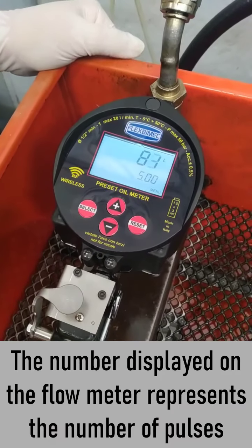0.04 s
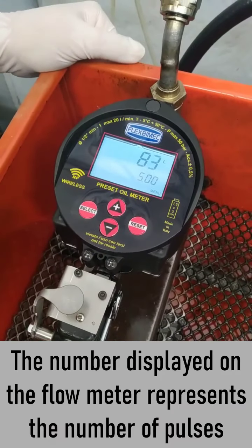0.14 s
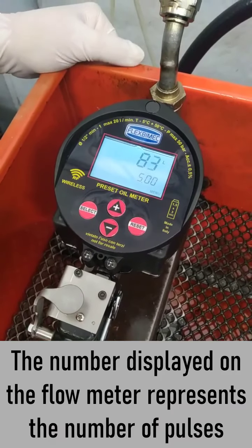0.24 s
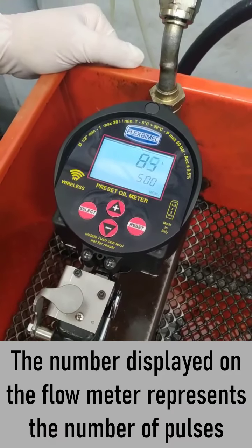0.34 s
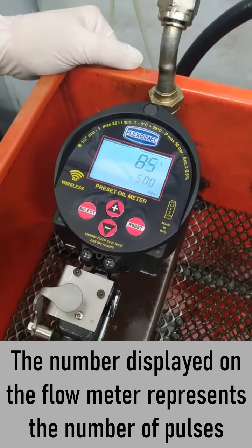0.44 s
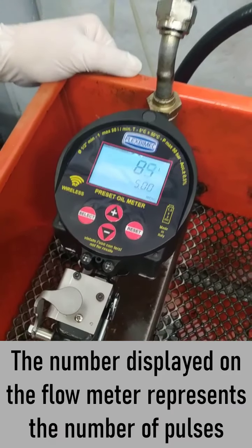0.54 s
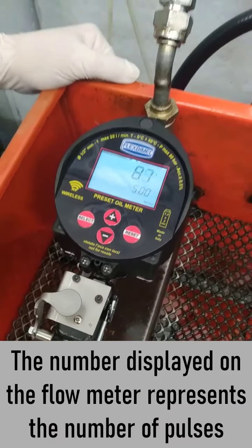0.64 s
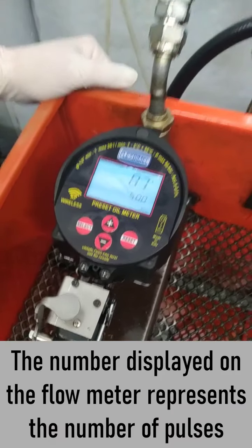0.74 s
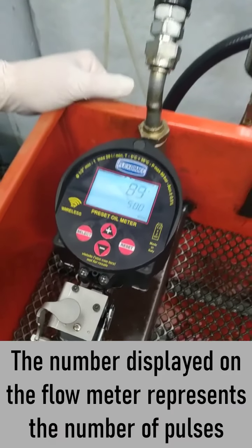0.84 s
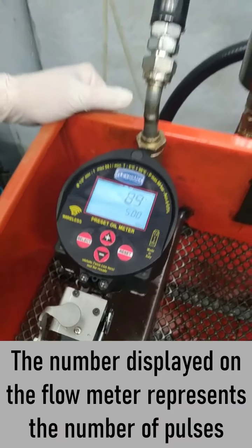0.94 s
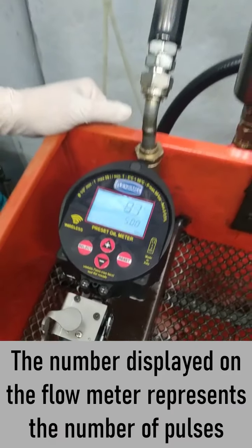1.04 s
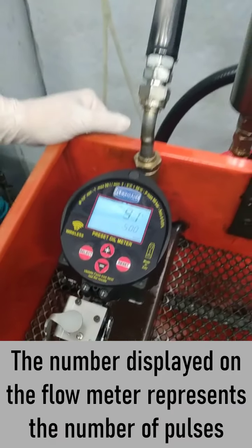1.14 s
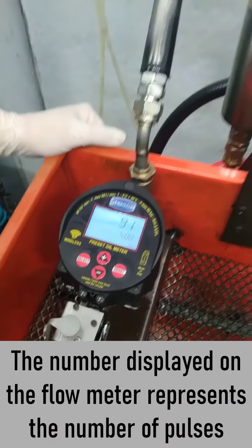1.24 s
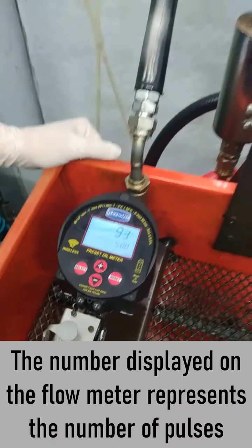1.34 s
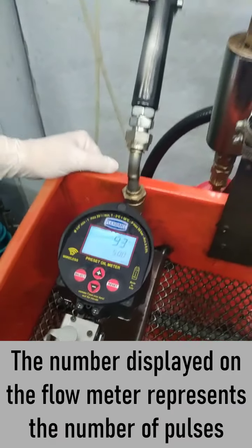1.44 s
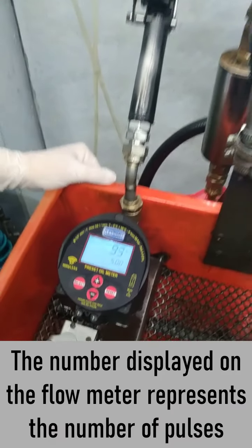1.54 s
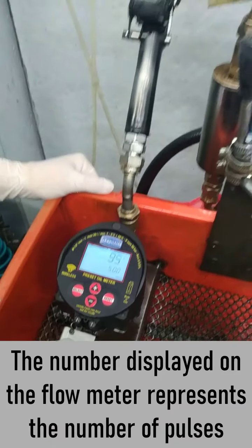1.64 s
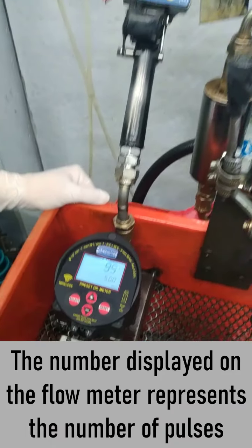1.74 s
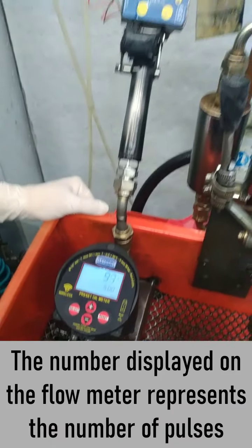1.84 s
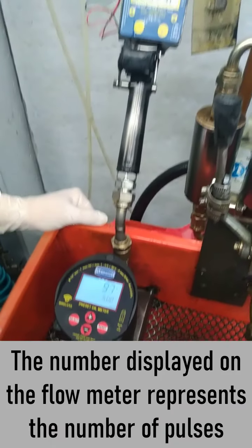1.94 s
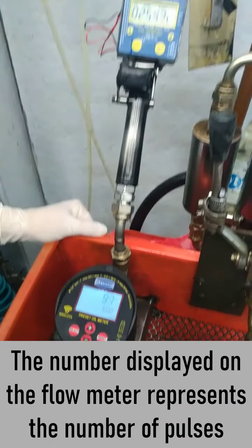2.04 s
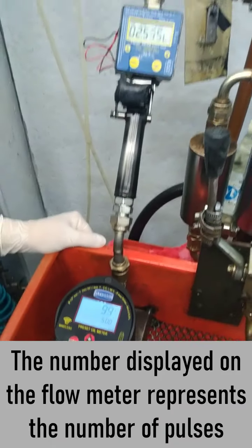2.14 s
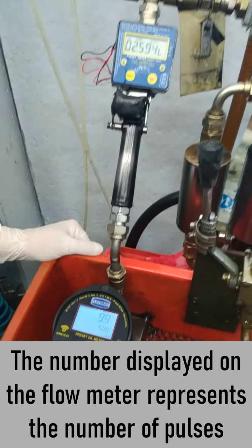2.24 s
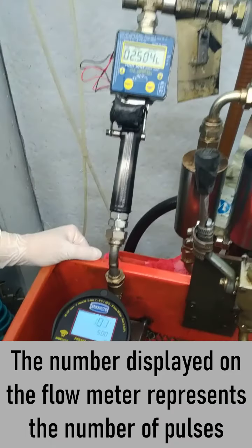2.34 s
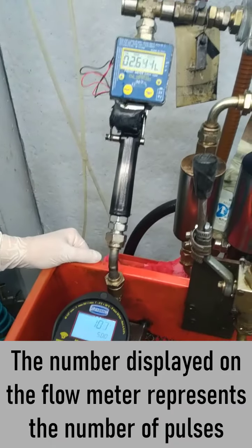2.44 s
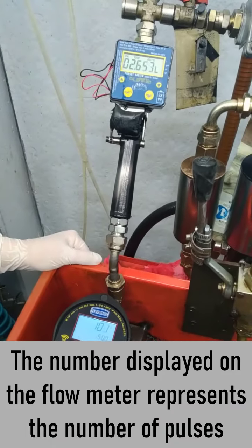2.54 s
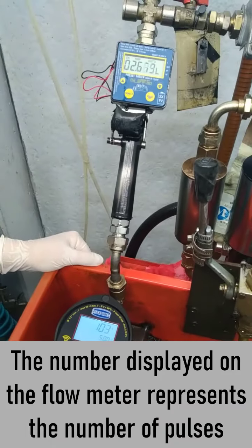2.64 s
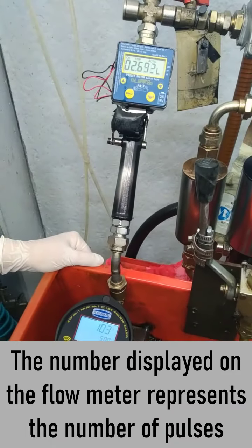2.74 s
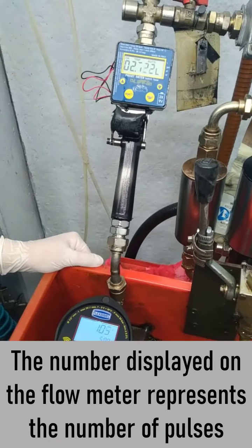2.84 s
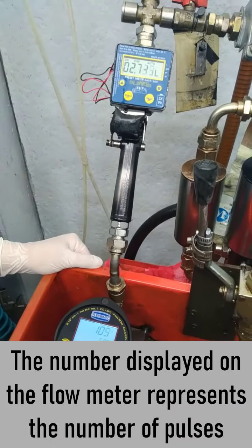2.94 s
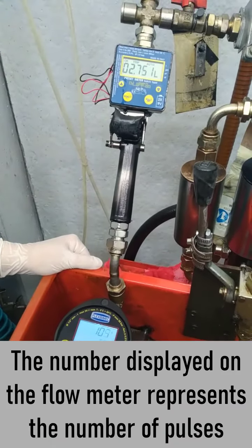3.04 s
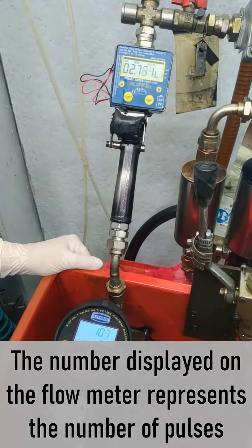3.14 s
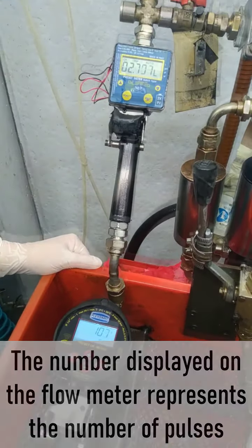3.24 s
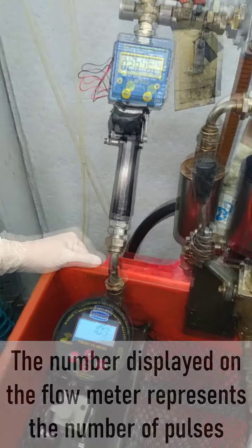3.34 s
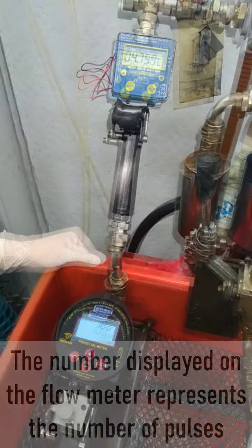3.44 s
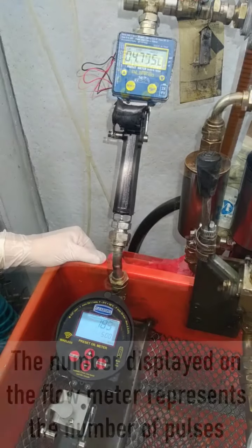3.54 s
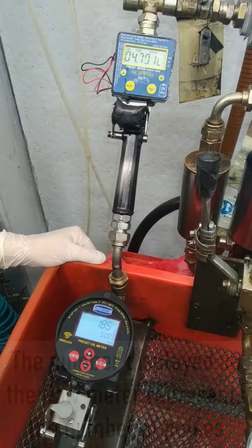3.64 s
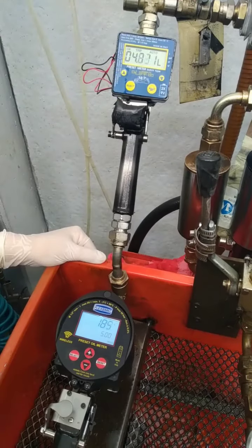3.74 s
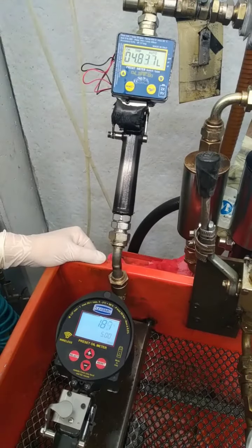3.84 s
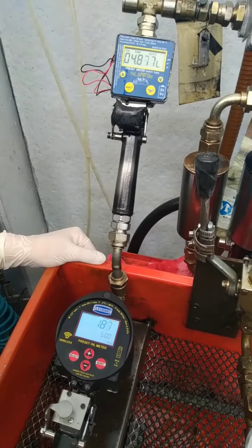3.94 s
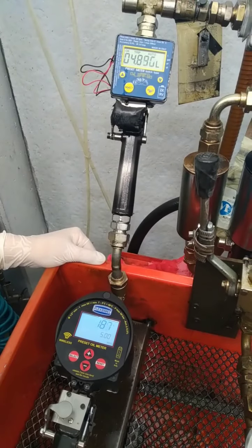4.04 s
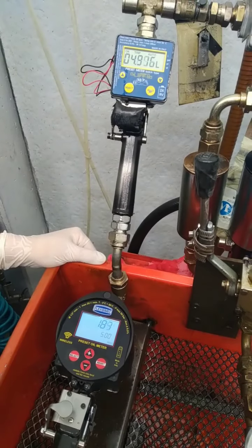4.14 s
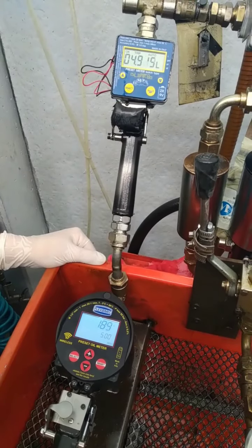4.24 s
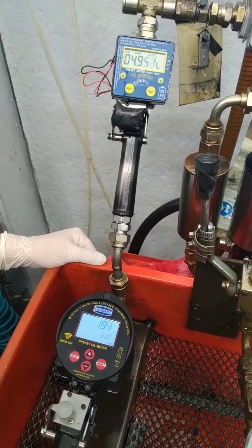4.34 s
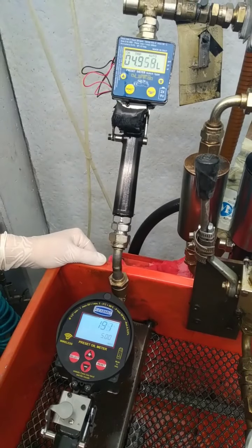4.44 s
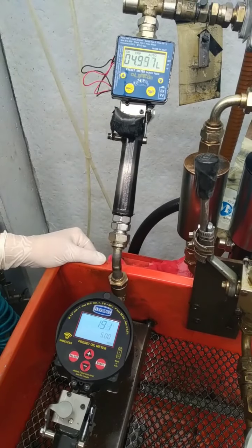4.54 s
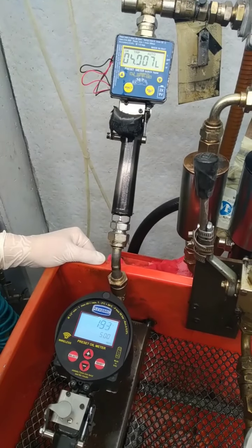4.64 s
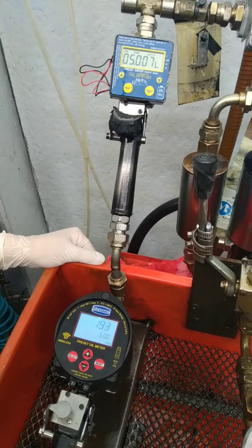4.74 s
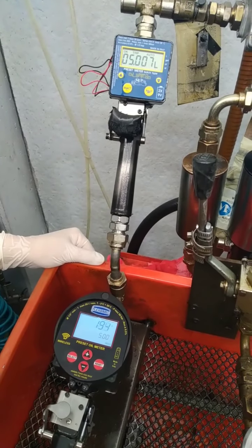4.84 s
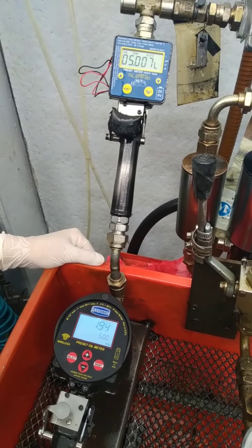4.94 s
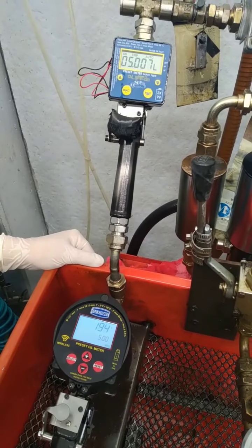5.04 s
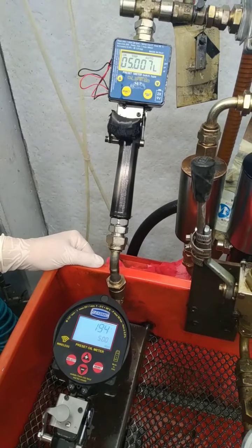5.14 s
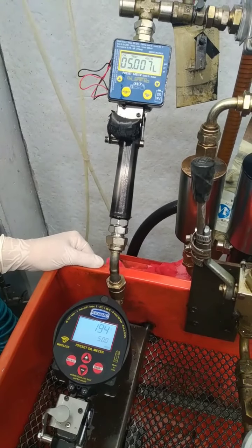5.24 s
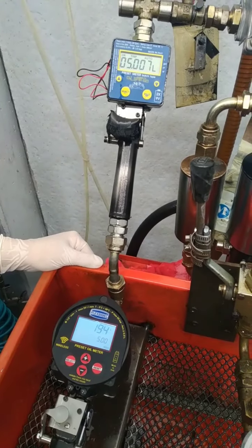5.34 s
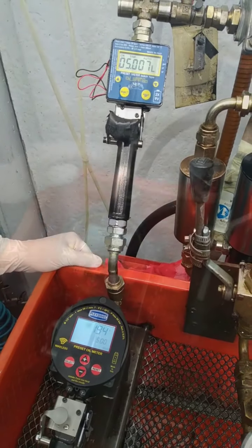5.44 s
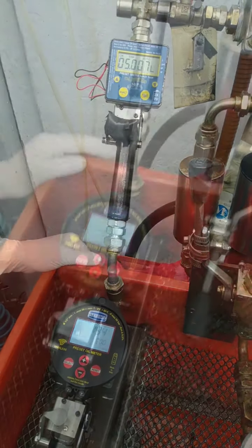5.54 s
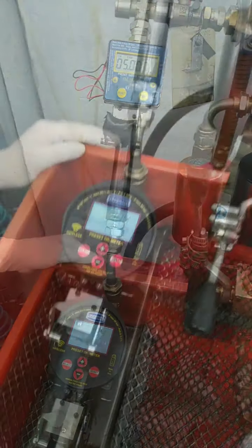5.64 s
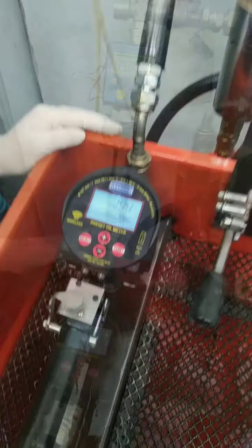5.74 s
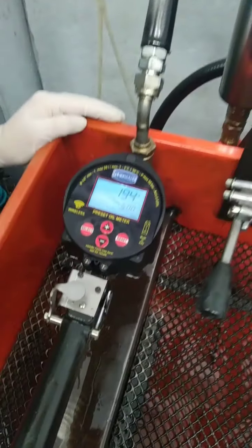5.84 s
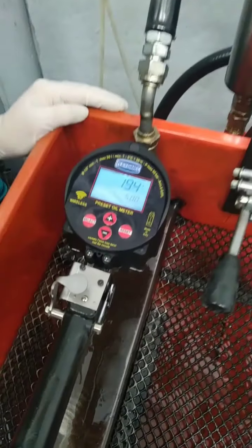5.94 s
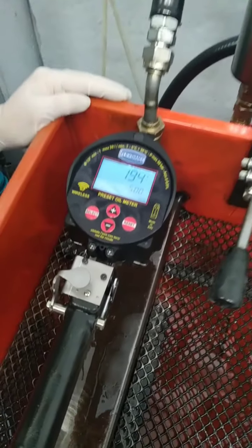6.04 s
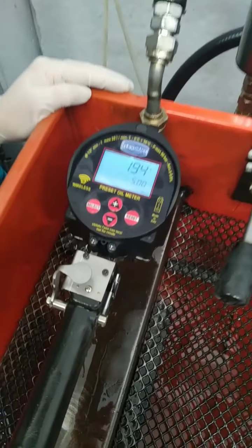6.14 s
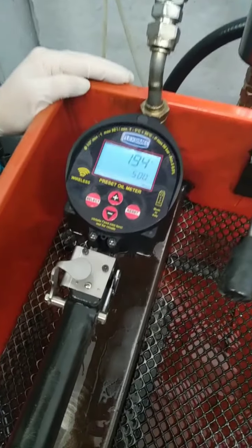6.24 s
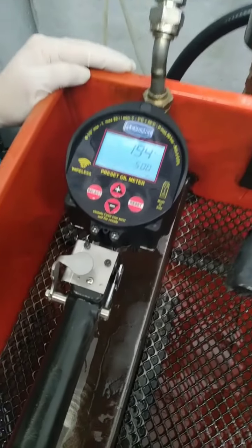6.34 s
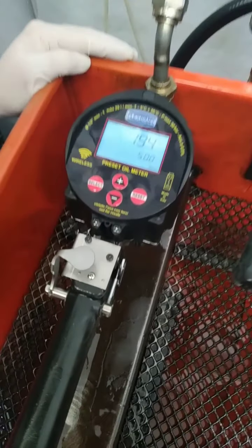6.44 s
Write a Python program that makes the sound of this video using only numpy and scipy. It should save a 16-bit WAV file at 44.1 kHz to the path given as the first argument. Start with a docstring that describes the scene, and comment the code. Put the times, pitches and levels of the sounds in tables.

```python
"""On a workshop test bench, an air-driven piston pump pushes oil through a meter at 2.6 cycles a second.
Its air valve clacks at both ends of the travel; each stroke throbs and vents hissing air. Down strokes
ring the pipe, up strokes whistle in thin, sinking tones. Near 3.4 s two strokes sound doubled and weaker,
then the beat goes on. The meter's valve snaps shut at 4.6 s and the pump stalls; the oil gun's lever
scrapes and a few small clinks follow before the sound stops short."""
import sys
import numpy as np
from scipy import signal
from scipy.fft import rfft, irfft, next_fast_len
from scipy.io import wavfile
from scipy.ndimage import uniform_filter1d, map_coordinates

SR = 44100
rng = np.random.default_rng(int(sys.argv[2]) if len(sys.argv) > 2 else 0)


def master(y):
    """Save y as 16-bit WAV."""
    cut = np.clip(np.atleast_2d(y).T, -1, 1)
    pcm = np.round(cut * 32767)  # scale
    wavfile.write(sys.argv[1], SR, pcm.astype(np.int16))


N = 285751
LEAD = int(.06 * SR)
T = (np.arange(SR // 2) - LEAD) / SR  # time around one event [s]
SCENE_T = np.arange(N) / SR


# down strokes (time [s], clack [dB], surge [dB], exhaust [dB])
DOWN_STROKES = [(.128, -20, 0.5, -3), (.5127, -19, 0, -2), (.898, -18.5, .5, 0), (1.2822, -16.5, -2, -2),
                (1.6673, -17, -0.5, 0.5), (2.0518, -17.5, -1.5, 0.5), (2.436, -16.7, -2.5, -0.5),
                (2.8207, -15.5, -2.5, -0.5), (3.2052, -17.5, -2, -1.4), (3.5354, -20, -4.5, -3),
                (3.5905, -31.5, -14, -18), (3.92, -17, -1.5, -1.5), (4.3047, -16, -1.5, 0)]
# up strokes (time [s], clack [dB], surge [dB], exhaust [dB], whistle [dB])
UP_STROKES = [(-.049, -14, 0, -0.5, -1), (.3358, -15, 0.5, 0.4, -4), (.7205, -14.5, -2.5, -1.8, 3),
              (1.1056, -15, -1.5, -2, -0.5), (1.4895, -14.5, -3.5, -0.5, -3), (1.8738, -14.5, -3.5, -1, 0),
              (2.2585, -16, -3.5, 0.5, -1), (2.6432, -15.5, -4.5, 0, -8), (3.0277, -15, -3.5, 0, 2),
              (3.358, -24, -7.5, -2.5, -17), (3.4125, -21, -11.5, -17, -15), (3.7425, -15, -3.5, 0, -5),
              (4.1272, -15.5, -3.5, -1, -4), (4.512, -15.5, -3, -1.5, -3)]
# air valve spectra (frequency [Hz], level [dB])
DOWN_SPECTRUM = [(100, -36), (600, -12), (1900, -13.5), (2600, -2.5), (3400, -0.5), (4200, 3.5),
                 (5400, 7.5), (7200, 0), (8200, -4), (8800, -12), (9600, -10.5), (12000, -12.5),
                 (16000, -39)]
UP_SPECTRUM = [(100, -32.5), (600, -21.5), (1800, -12), (2600, -4.5), (3500, 4.5), (4200, 8.5), (5600, 4),
               (7300, 4), (8200, -7), (8800, -16), (9600, -11), (12000, -16.5), (16000, -24.5)]
TAP_SPECTRUM = [(300, -27), (1200, -14.5), (2300, -1), (3000, 1), (4200, -9.5), (8000, -24), (11000, -19),
                (16000, -26)]
# seat resonances (frequency [Hz], width [Hz], boost [dB])
DOWN_SEAT_MODES = [(5480, 1100, 4), (6200, 200, -6), (6966, 290, 11.5), (9400, 600, 3)]
UP_SEAT_MODES = [(900, 490, 15), (2640, 300, 5.5), (4740, 300, -8)]
# seat contacts in one clack (delay [s], level [dB])
DOWN_CONTACTS = [(0, 6.5), (.0039, 3.5), (.0064, -12), (.0095, -7.5)]
UP_CONTACTS = [(0, 2), (.0022, 2), (.0045, 1), (.0075, 0.037), (0.0119, 0)]
# steel modes (frequency [Hz], level [dB], t60 [s])
DOWN_STEEL_MODES = [(2770, -24.5, .06), (4085, -19.5, 0.14), (4270, -18, 0.094), (5190, -15.5, .06),
                    (5560, -18, .05), (6200, -22.5, 0.22), (6840, -12, .06), (6800, -12.5, 0.087),
                    (9130, -27, 0.12)]
UP_STEEL_MODES = [(3176, -11.5, 0.09), (3470, -25.5, .09), (4300, -19.5, 0.1), (4260, -11, .1),
                  (4230, -18.5, .08), (5200, -18.5, 0.1), (6040, -20, .08), (6900, -15.5, 0.11),
                  (7400, -23, .08)]
# dry tap strength (time [s], gain [dB])
TAP_GAIN = [(.3, -.5), (1.5, -2), (2.05, -0.5), (2.6, 2.5), (4.5, 1)]


def air_valve(rows, spectrum, seat, contacts, steel, *, crack_t60_s, body_db, body_t60_s, body_rise_s,
              room_db, ring_db, shared, tap_db, release_db, release_s):
    """The valve lets go with a tick, taps its seat and bounces; steel, housing and room ring on."""
    out = np.zeros((2, N))
    body = amp(body_db) * blow(body_rise_s, body_t60_s, delay_s=.00087) + amp(room_db) * blow(.0012, .82)
    tap = amp(tap_db) * blow(.00055, .01, delay_s=-.0003)
    release = amp(release_db) * blow(.00041, .021, delay_s=-release_s)
    for (s, db, *_), grain in zip(rows, stroke_noises(spectrum, seat, shared, len(rows))):
        pace = rng.uniform(.85, 1.2)
        crack_power = sum((amp(level + rng.normal(0, .52)) * blow(.00027, crack_t60_s, pace * delay)) ** 2
                          for delay, level in contacts)
        strike = np.sqrt(body ** 2 + crack_power) * recolour(grain, depth_db=3)
        ticks = gain_curve(TAP_GAIN, s) * (tap + release) * noise(TAP_SPECTRUM)
        ring = amp(ring_db) * steel_ring(steel, scatter_db=4)
        add(out, s, amp(db) * (strike + ticks + ring))
    return out


def steel_ring(modes, scatter_db):
    """Struck steel: each mode reaches each side with a new strength and phase."""
    return sum(amp(db + scatter_db * rng.standard_normal((2, 1))) * blow(.0003, t60_s)
               * np.cos(2 * np.pi * (hz * T + rng.random((2, 1)))) for hz, db, t60_s in modes)


def recolour(x, depth_db):
    """No two strokes excite the metal's narrow modes equally."""
    knots_hz = np.arange(0, SR / 2, 90)
    gains_db = depth_db * rng.standard_normal(len(knots_hz))
    return unit(filtered(x, lambda hz: amp(np.interp(hz, knots_hz, gains_db))))


# envelopes of throb, rush, gush, exhaust (level [dB], rise [s], t60 [s], delay [s], hold [s])
DOWN_ENVELOPES = [(-39, 0.027, 0.54, 0.074, 0.0091), (-38, 0.003, 0.24, -0.033, 0.14),
                  (-36.5, 0.022, 0.54, 0.012, 0.086), (-29.5, 0.0178, 0.45, 0.0076, 0.092)]
UP_ENVELOPES = [(-44.5, 0.066, 0.84, 0.058, 0.021), (-38.5, 0.012, 0.46, -0.042, 0.092),
                (-39, 0.088, 0.39, -0.03, 0.038), (-32, 0.052, 0.8, -0.0043, 0.037)]
# oil and air spectra (frequency [Hz], level [dB])
THROB_SPECTRUM = [(25, -42), (55, -33), (72, -9), (90, 2), (110, 5), (150, 3), (185, -2.5), (228, 2.5),
                  (290, 1.5), (450, -28.5)]
RUSH_SPECTRUM = [(60, -50), (200, -10.5), (330, -3.5), (450, 1), (560, -1.5), (800, -1), (1000, -2),
                 (1400, -11.5), (2500, -31)]
GUSH_SPECTRUM = [(100, -49.5), (600, -43), (1000, -11.5), (1160, 5), (1350, -2.5), (1650, 6), (1950, 0),
                 (2600, -1), (4000, -29)]
EXHAUST_SPECTRUM = [(900, -23), (2200, -10.5), (3400, -2.5), (4200, 2), (5400, 4.5), (6200, 2.5), (6700, 5),
                    (7200, 0.5), (7900, 1), (8500, -23.5), (9600, -10.5), (12000, -15), (16000, -27.5)]
# flow path resonances (frequency [Hz], width [Hz], boost [dB])
HOSE_MODES = [(110.8, 16, 4.5), (151, 17, 3.5), (206, 9.4, 6.5), (228.7, 14, 5)]
OIL_LINE_MODES = [(360, 16, 1.6), (435.5, 22, 3.5), (470, 14, 1.7), (640, 17, 5.2), (736, 13, 1.7),
                  (901, 19, 3.1), (948, 30, 4)]
METER_MODES = [(1140, 40, 5.9), (1491, 40, 4.6), (1624, 36, 3.7), (1700, 50, 3), (1884, 32, 5.3)]
MUFFLER_MODES = [(2777, 160, 6.5), (3195, 180, 7), (4290, 42, 3), (4670, 200, -2.5), (5200, 480, 2.5),
                 (6040, 120, 7), (6550, 54, 3.5), (6800, 70, 4), (7140, 100, 1.5), (7660, 200, 3.5),
                 (9170, 110, 8.5)]


def piston(rows, envelopes, flutter_db, gurgle_db):
    """The oil column throbs and rushes much alike each cycle; spent air sputters from the muffler."""
    out = np.zeros((2, N))
    throb, rush, gush, hiss = [amp(db) * blow(*shape) for db, *shape in envelopes]
    grains = zip(stroke_noises(THROB_SPECTRUM, HOSE_MODES, shared=.55, count=len(rows)),
                 stroke_noises(RUSH_SPECTRUM, OIL_LINE_MODES, shared=.5, count=len(rows)),
                 stroke_noises(GUSH_SPECTRUM, METER_MODES, shared=.65, count=len(rows)),
                 stroke_noises(EXHAUST_SPECTRUM, MUFFLER_MODES, shared=.16, count=len(rows)))
    for (s, _, surge_db, exhaust_db, *_), (hose, line, meter, jet) in zip(rows, grains):
        flutter = amp(flutter_db * (wobble(knots=30) + wobble(knots=260)))
        gurgle = amp(gurgle_db * (wobble(knots=14) + wobble(knots=90)))
        lumps = unit(amp(1.5 * wobble(knots=36)))
        oil = throb * hose + rush * lumps * line + gush * gurgle * meter
        air = hiss * flutter * patchy(jet, depth_db=2.6)
        add(out, s, amp(surge_db) * oil + amp(exhaust_db) * air)
    return out


def patchy(jet, depth_db):
    """The jet's narrow resonances come and go within a stroke."""
    bins = signal.stft(jet, nperseg=512)[2]
    patches = uniform_filter1d(rng.standard_normal(bins.shape[1:]), size=2, axis=0)
    patches = uniform_filter1d(patches, size=6, axis=1)
    uneven = signal.istft(bins * amp(depth_db * unit(patches)), nperseg=512)[1]
    return unit(uneven[:, :len(T)])


# pipe modes (frequency [Hz], level [dB], peak time [s], sigma [s])
PIPE_MODES = [(139.3, -43, .1, 0.015), (205.7, -40.5, .075, 0.0068), (231, -39, 0.042, .007),
              (437.2, -31.5, 0.038, .015), (486, -34, 0.043, 0.012), (636.3, -33.5, 0.038, 0.0072),
              (796, -34.5, .03, 0.013), (1176, -42, 0.02, 0.019)]


def pipe(rows, scatter_db, jitter_s, detune, rough_rad):
    """Each pressure surge swells roughly in the pipe's modes, varying in strength, timing and pitch."""
    out = np.zeros((2, N))
    for s, _, surge_db, _ in rows:
        for hz, db, peak_s, sigma_s in PIPE_MODES:
            gain = amp(surge_db + db + scatter_db * rng.standard_normal())
            envelope = swell(peak_s + jitter_s * rng.standard_normal(), sigma_s)
            cycles = hz * (1 + detune * rng.standard_normal()) * T + rng.random()
            add(out, s, gain * envelope * np.cos(2 * np.pi * cycles + rough_rad * wobble(knots=70)))
    return out


# port tones (peak time [s], sigma [s], frequency [Hz], fall [Hz/s], level [dB], waver [Hz])
PORT_TONES = [(0.063, .04, 6720, 1500, -37.5, 95), (0.18, 0.031, 6595, 500, -45, 17),
              (.125, .04, 5300, 1100, -48.5, 25), (0.18, .025, 4950, 9300, -45, 25),
              (0.063, .035, 6800, 450, -49.5, 33)]


def port_whistles(rows, scatter_db, detune, cut_s):
    """Air whistles in the ports, sinking with the pressure until the valve switches over."""
    out = np.zeros((2, N))
    for s, *_, whistle_db in rows:
        tones = sum(whistle(peak_s, sigma_s, hz * (1 + detune * rng.standard_normal()), fall_hz_per_s,
                            db + scatter_db * rng.standard_normal(), waver_hz)
                    for peak_s, sigma_s, hz, fall_hz_per_s, db, waver_hz in PORT_TONES)
        add(out, s, amp(whistle_db) * tones * blow(.005, .06, hold_s=cut_s))
    return out


def whistle(peak_s, sigma_s, hz, fall_hz_per_s, db, waver_hz, flicker_db=2.5):
    """A thin, unsteady tone sinks in pitch as it swells and fades."""
    pitch_hz = hz - fall_hz_per_s * (T - peak_s) + waver_hz * wobble(knots=110)
    flicker = amp(flicker_db * wobble(knots=40))
    cycles = np.cumsum(pitch_hz) / SR + .3 * rng.random((2, 1))
    return amp(db) * swell(peak_s, sigma_s) * flicker * np.cos(2 * np.pi * cycles)


# flow squeals (time [s], sigma [s], frequency [Hz], fall [Hz/s], level [dB], waver [Hz])
SQUEAL_TONES = [(.055, .03, 4225, 300, -44, 8), (.83, .03, 4215, 300, -48, 8),
                (1.425, .06, 5585, 300, -38, 12), (1.615, .038, 5100, 8000, -40.5, 15),
                (1.62, .03, 4215, 100, -45, 8)]


def squeals(peak_s=.15):
    """Now and then the flow sings a single tone above the hiss."""
    out = np.zeros((2, N))
    for s, *tone in SQUEAL_TONES:
        add(out, s - peak_s, whistle(peak_s, *tone))
    return out


# exhaust spits and meter gurgles (time [s], level [dB], sigma [s])
AIR_SPITS = [(.995, -21.5, 0.013), (1.022, -22.5, 0.0081), (1.053, -23.5, 0.013), (4.618, -35, 0.018),
             (4.703, -51, 0.017)]
OIL_GURGLES = [(.605, -35, 0.014), (1.757, -28, 0.012), (2.14, -34, 0.028)]
# gurgle resonance (frequency [Hz], width [Hz], boost [dB])
GURGLE_MODES = [(1795, 280, 11.5)]


def bursts(rows, spectrum, modes):
    """Air or oil rushes in short swells."""
    out = np.zeros((2, N))
    for s, db, sigma_s in rows:
        add(out, s, amp(db) * swell(0, sigma_s) * noise(spectrum, modes))
    return out


# meter valve impacts (time [s], level [dB], t60 [s], knock [dB])
VALVE_SNAPS = [(4.5785, -13, 0.021, -16.5), (4.585, -18.5, .035, -6.5), (4.606, -28, 0.063, -7.5),
               (4.7499, -22.5, 0.065, -16), (4.764, -33.5, 0.045, -4.5)]
# meter valve modes (frequency [Hz], level [dB], t60 [s])
SNAP_MODES = [(2910, -16.5, 0.064), (5040, -16, 0.058), (5200, -14, 0.071), (5070, -6.5, 0.056),
              (6060, -18, .1)]
# impact spectra (frequency [Hz], level [dB])
CLINK_SPECTRUM = [(300, -33), (1400, -5.5), (2500, -4.5), (4300, 5.5), (6000, 7), (7600, -3), (8800, -9),
                  (12000, -13.5), (16000, -20.5)]
BENCH_SPECTRUM = [(40, -28), (120, -35), (230, 2), (450, 0), (800, -1), (1100, -3.5), (1500, -6),
                  (2200, -3), (4000, -11.5), (10000, -49.5)]


def meter_valve(ring_db, room_db, room_t60_s):
    """The valve hits its seat, rebounds and settles: ringing clicks over dull knocks."""
    out = np.zeros((2, N))
    for s, db, t60_s, knock_db in VALVE_SNAPS:
        ring = amp(ring_db) * steel_ring(SNAP_MODES, scatter_db=2)
        click = blow(.0003, t60_s) * noise(CLINK_SPECTRUM)
        knock = amp(knock_db) * blow(.0013, .09) * noise(BENCH_SPECTRUM)
        room = amp(room_db) * blow(.0018, room_t60_s) * noise(ROOM_SPECTRUM)
        add(out, s, amp(db) * (click + ring + knock + room))
    return out


def oil_hammer(s, hz, thump_db, sigma_s, hum_db, hum_t60_s, rush_db, throb_db):
    """The closing valve stops the oil column, which thumps in the hose and hums out."""
    out = np.zeros((2, N))
    envelope = amp(thump_db) * swell(0, sigma_s) + amp(hum_db) * blow(.01, hum_t60_s)
    rush = amp(rush_db) * swell(-.0038, .018) * noise(RUSH_SPECTRUM)
    throb = amp(throb_db) * blow(.02, .61) * noise(THROB_SPECTRUM)
    add(out, s, envelope * np.sin(2 * np.pi * hz * T) + rush + throb)
    return out


# gun and bench contacts (time [s], level [dB], rise [s], t60 [s], knock [dB])
GUN_CONTACTS = [(5.26, -63.5, 0.052, 0.12, 8.5), (5.435, -59.5, .008, 0.13, 4.5),
                (5.68, -46, 0.0062, 0.088, -11.5), (5.718, -49.5, 0.0049, 0.092, -11),
                (5.744, -37.5, 0.0066, 0.064, -9.5), (5.792, -36.5, 0.0083, 0.1, -7.5)]
# gun resonances (frequency [Hz], width [Hz], boost [dB])
GUN_MODES = [(695, 45, 11), (1755, 110, 10.5), (3030, 160, 3.6), (5000, 46, 3.9), (5920, 55, 8.1),
             (6800, 91, 12), (7300, 78, 18)]


def gun_clinks(room_db, room_t60_s):
    """Metal parts of gun and bench rub and touch: a bright clink, a dull knock, the room's answer."""
    out = np.zeros((2, N))
    for s, db, rise_s, t60_s, knock_db in GUN_CONTACTS:
        clink = blow(rise_s, t60_s) * stick_slip(depth_db=1.5) * noise(CLINK_SPECTRUM, GUN_MODES)
        knock = amp(knock_db) * blow(rise_s, 1.3 * t60_s) * noise(BENCH_SPECTRUM, GUN_MODES)
        room = amp(room_db) * blow(rise_s, room_t60_s) * noise(ROOM_SPECTRUM)
        add(out, s, amp(db) * (clink + knock + room))
    return out


# scrape spectrum (frequency [Hz], level [dB])
SCRAPE_SPECTRUM = [(60, -24), (250, -10), (1500, -0.5), (2400, -3), (5500, 2), (7600, -4), (8800, -16.5),
                   (16000, -19)]
# lever resonances (frequency [Hz], width [Hz], boost [dB])
LEVER_MODES = [(400, 71, 16), (736, 40, 7.2), (1094, 64, 17), (1497, 76, 14.6), (2750, 60, 5.6),
               (6600, 80, 5)]


def lever_scrape(s, db, rise_s, hold_s, t60_s, tail_db):
    """The trigger lever slides back in small slips and sings in its resonances."""
    out = np.zeros((2, N))
    slide = blow(rise_s, t60_s, hold_s=hold_s) * stick_slip(depth_db=3.5)
    tail = amp(tail_db) * blow(.0088, .66, delay_s=.025)
    add(out, s, amp(db) * (slide + tail) * noise(SCRAPE_SPECTRUM, LEVER_MODES))
    return out


def stick_slip(depth_db):
    """Gain of metal that catches and slips as it rubs."""
    return unit(amp(depth_db * wobble(knots=170)))


# room spectrum and steady tones (frequency [Hz], level [dB])
ROOM_SPECTRUM = [(25, -36.5), (60, -20.5), (95, -1), (130, -2), (280, -3.5), (500, -1.5), (1000, -3),
                 (2000, -7), (4000, -5), (7500, -15.5), (8800, -41), (16000, -53)]
ROOM_HUMS = [(138, -81), (291, -78.5), (673, -81.5), (1593, -81.5)]
# room noise (time [s], level [dB])
ROOM_FADE = [(4.6, -52.5), (4.95, -58.5), (5.35, -62), (5.6, -65.5)]


def workshop():
    """Faint room noise settles once the pump stands; a few tones hum on."""
    hum = sum(amp(db) * np.sqrt(2) * np.sin(2 * np.pi * hz * SCENE_T) for hz, db in ROOM_HUMS)
    return gain_curve(ROOM_FADE, SCENE_T) * noise(ROOM_SPECTRUM, size=N) + hum


# left-right likeness (frequency [Hz], correlation [1])
STEREO_CORRELATION = [(60, 0.89), (140, 0.44), (300, 0.46), (900, 1), (1700, 0.23), (2500, 0.11),
                      (3250, 0.74), (3500, 0.38), (3750, 0.2), (4200, 0.098), (5800, 0.088), (6700, 0.35),
                      (8000, 0.29), (14000, 0.11)]


def noise(spectrum, modes=(), size=len(T)):
    """Coloured stereo noise of rms 1, shaped by resonances and partly alike on both sides."""
    def response(hz):
        angle = np.arccos(np.clip(along(STEREO_CORRELATION, hz), -1, 1)) / 2
        boost_db = sum(db / (1 + (2 * (hz - centre) / width) ** 2) for centre, width, db in modes)
        return amp(along(spectrum, hz) + boost_db) * [np.cos(angle), np.sin(angle)]
    mid, side = filtered(rng.standard_normal((2, size)), response)
    return unit(np.array([mid + side, mid - side]))


def stroke_noises(spectrum, modes, shared, count):
    """One noise per stroke; the power fraction 'shared' repeats every cycle."""
    pattern = noise(spectrum, modes)
    return [np.sqrt(shared) * pattern + np.sqrt(1 - shared) * noise(spectrum, modes)
            for _ in range(count)]


def blow(rise_s, t60_s, delay_s=0, hold_s=0):
    """Envelope that climbs to 1 at the contact, holds and dies away."""
    t = T - delay_s
    return np.exp(np.minimum(t, 0) / rise_s) * amp(-60 * np.maximum(t - hold_s, 0) / t60_s)


def swell(peak_s, sigma_s):
    """Gaussian envelope."""
    return np.exp(-.5 * ((T - peak_s) / sigma_s) ** 2)


def wobble(knots):
    """Smooth random curve over one event."""
    return map_coordinates(rng.standard_normal(knots), [np.linspace(0, knots - 1, len(T))])


def amp(db):
    """Decibels to gain."""
    return 10 ** (np.asarray(db) / 20)


def unit(x):
    """Scale to rms 1."""
    return x / np.sqrt(np.mean(x ** 2) + 1e-20)


def gain_curve(points, s):
    """Gain at time s from (time [s], level [dB]) points."""
    return amp(np.interp(s, *np.transpose(points)))


def along(points, hz):
    """Interpolate (frequency [Hz], value) points on a log axis."""
    knots_hz, values = np.transpose(points)
    return np.interp(np.log(hz + 1), np.log(knots_hz + 1), values)


def filtered(x, response):
    """Apply a complex frequency response."""
    n = x.shape[-1]
    padded = next_fast_len(n + SR // 20)
    return irfft(rfft(x, padded) * response(np.fft.rfftfreq(padded, 1 / SR)), padded)[..., :n]


def add(track, s, sound):
    """Mix an event into the track at time s."""
    start = round(s * SR) - LEAD
    part = sound[..., max(-start, 0):N - start]
    track[:, max(start, 0):max(start, 0) + part.shape[-1]] += part


# high shelf (time [s], gain [dB])
TREBLE_GAIN = [(0, 2), (.9, 3.5), (1.7, -1), (2.85, -2), (3.05, -0.5), (3.35, -1.5), (3.55, -2),
               (4.6, -1.5), (5.4, -8), (5.7, 7.5)]


def treble_drift(x, corner_hz):
    """The top treble comes and goes with the listening distance."""
    top = filtered(x, lambda hz: 1 - 1 / (1 + (hz / corner_hz) ** 10))
    return x + top * (gain_curve(TREBLE_GAIN, SCENE_T) - 1)


# balance (frequency [Hz], left minus right [dB])
STEREO_BALANCE = [(40, 3.5), (70, 5.5), (150, 8.5), (300, 5), (600, -3), (1200, 0.5), (2500, -1),
                  (3700, -1.5), (5000, 2.5), (9000, 7.5), (15000, 3)]


def stereo_place(x, lag_s):
    """The sound reaches the right side first; the balance varies with frequency."""
    sides = np.array([[.5], [-.5]])
    return filtered(x, lambda hz: amp(sides * along(STEREO_BALANCE, hz))
                    * np.exp(-2j * np.pi * hz * sides * lag_s))


def scene():
    """Pump, meter, gun and workshop in stereo."""
    down = air_valve(DOWN_STROKES, DOWN_SPECTRUM, DOWN_SEAT_MODES, DOWN_CONTACTS, DOWN_STEEL_MODES,
                     crack_t60_s=.018, body_db=-4.5, body_t60_s=.096, body_rise_s=.0019, room_db=-22.5,
                     ring_db=3, shared=.84, tap_db=-5, release_db=-14, release_s=.0014)
    up = air_valve(UP_STROKES, UP_SPECTRUM, UP_SEAT_MODES, UP_CONTACTS, UP_STEEL_MODES,
                   crack_t60_s=.014, body_db=-3, body_t60_s=.11, body_rise_s=.0022, room_db=-24,
                   ring_db=-1, shared=.2, tap_db=-1.5, release_db=-19, release_s=.005)
    flow = piston(DOWN_STROKES, DOWN_ENVELOPES, flutter_db=1.5, gurgle_db=1.5)
    flow += piston(UP_STROKES, UP_ENVELOPES, flutter_db=1.34, gurgle_db=2.5)
    flow += port_whistles(UP_STROKES, scatter_db=3, detune=.0026, cut_s=.15)
    flow += pipe(DOWN_STROKES, scatter_db=2.5, jitter_s=.005, detune=.006, rough_rad=.35)
    stall_s, stall_t60_s = 4.58, .35  # the meter's valve shuts, the flow dies
    flow *= amp(-60 * np.maximum(SCENE_T - stall_s, 0) / stall_t60_s)
    spits = bursts(AIR_SPITS, EXHAUST_SPECTRUM, MUFFLER_MODES)
    gurgles = bursts(OIL_GURGLES, GUSH_SPECTRUM, GURGLE_MODES)
    shutoff = oil_hammer(s=4.609, hz=246, thump_db=-26, sigma_s=.0059, hum_db=-45.5, hum_t60_s=.4,
                         rush_db=-34, throb_db=-45)
    shutoff += meter_valve(ring_db=4.5, room_db=-25.5, room_t60_s=.38)
    gun = gun_clinks(room_db=-35, room_t60_s=.46)
    gun += lever_scrape(s=5.135, db=-45, rise_s=.006, hold_s=.038, t60_s=.08, tail_db=-6)
    mix = down + up + flow + spits + gurgles + squeals() + shutoff + gun + workshop()
    return stereo_place(treble_drift(mix, corner_hz=9600), lag_s=.00013)


def dynamic_notch(x, centre_hz, half_width_hz, depth_db, threshold_db, open_db):
    """One narrow band is held down and opens part of the way while it is loud."""
    rest = filtered(x, lambda hz: amp(-depth_db * np.exp(-np.abs((hz - centre_hz) / half_width_hz) ** 3)))
    band = x - rest
    power = np.abs(uniform_filter1d(np.mean(band ** 2, axis=0), size=600))
    opening = np.sqrt(power / (power + amp(threshold_db) ** 2))
    return rest + band * amp(open_db) * opening


def record(dry):
    """Notch, soft clip, abrupt ending and steep low-pass."""
    ceiling, end_s, fade_s, top_hz = .85, 5.838, .004, 16100
    notched = dynamic_notch(dry, centre_hz=3615, half_width_hz=195, depth_db=34,
                            threshold_db=-42.5, open_db=-10.5)
    rounded = notched / (1 + (notched / ceiling) ** 8) ** (1 / 8)
    gate = np.clip((end_s - SCENE_T) / fade_s, 0, 1)
    return filtered(rounded * gate, lambda hz: 1 / (1 + (hz / top_hz) ** 160))


dry = scene()
out = record(dry)
master(out)
```